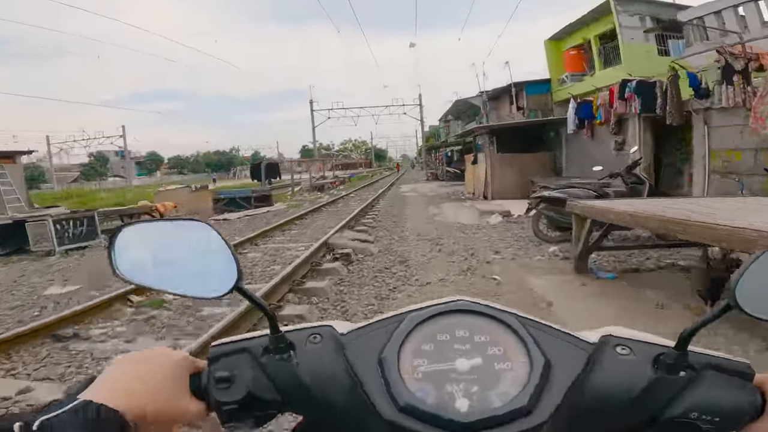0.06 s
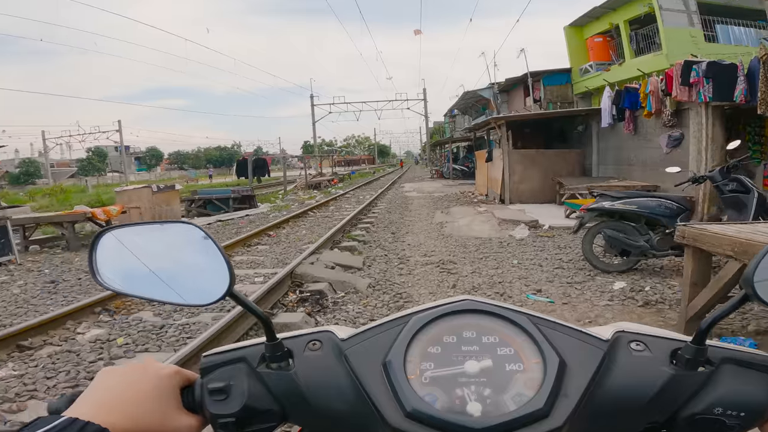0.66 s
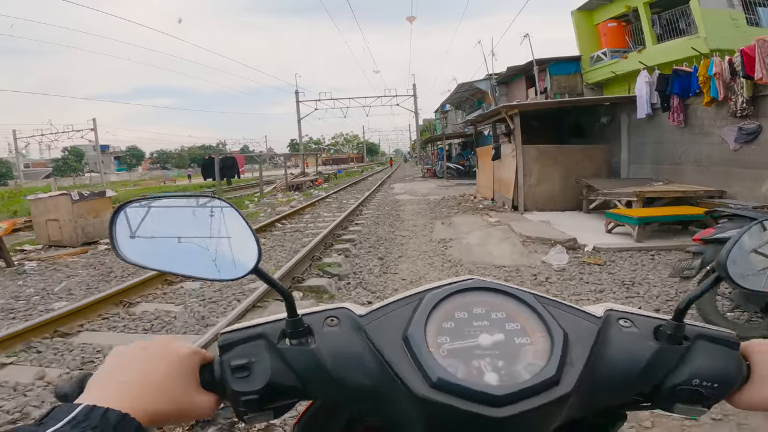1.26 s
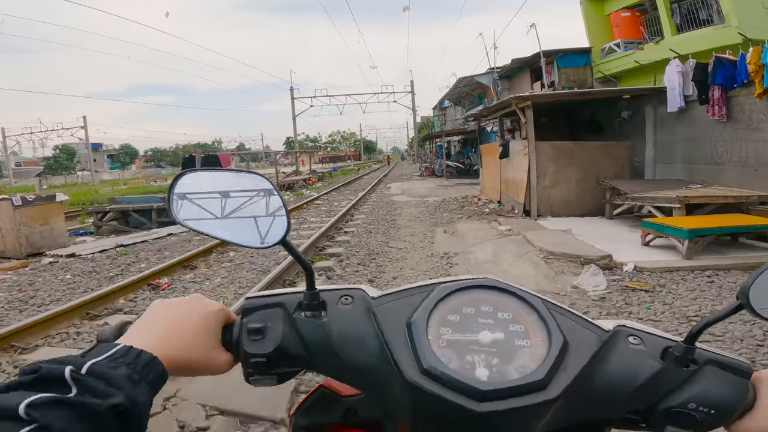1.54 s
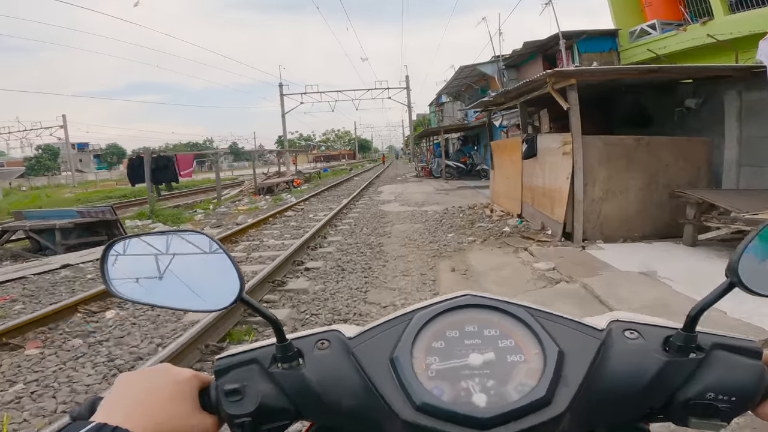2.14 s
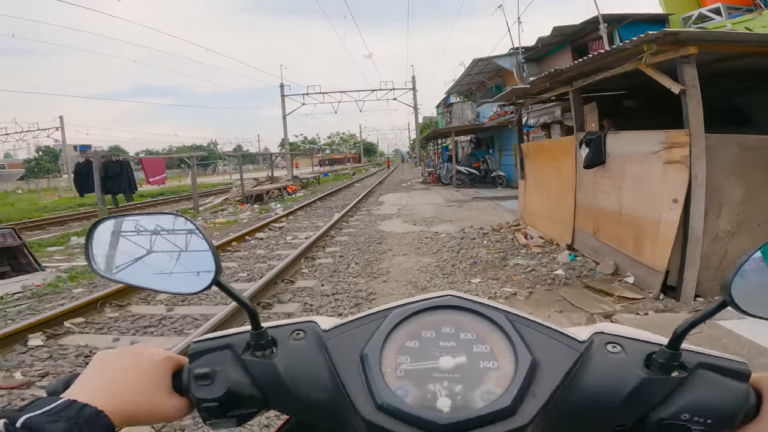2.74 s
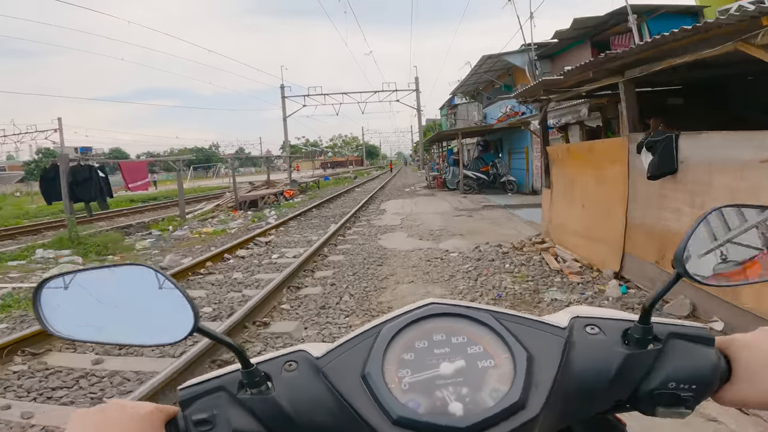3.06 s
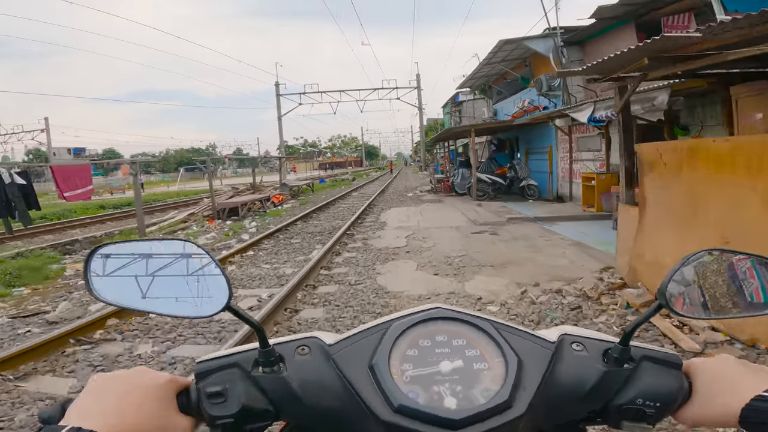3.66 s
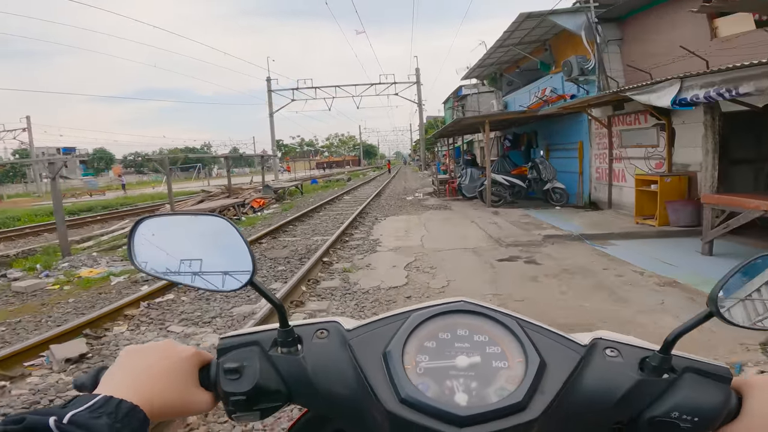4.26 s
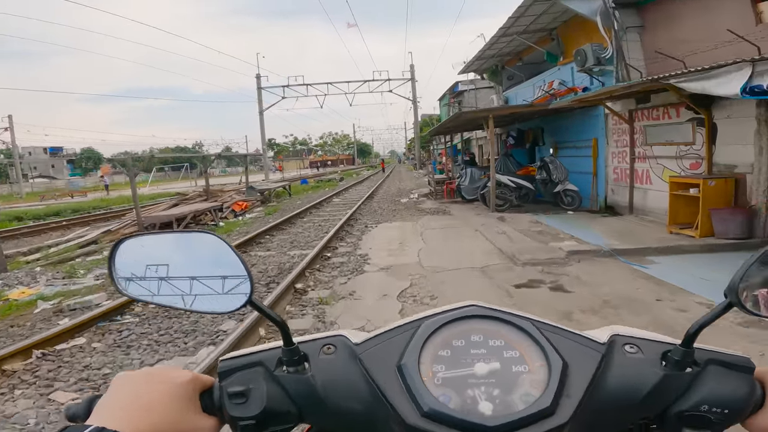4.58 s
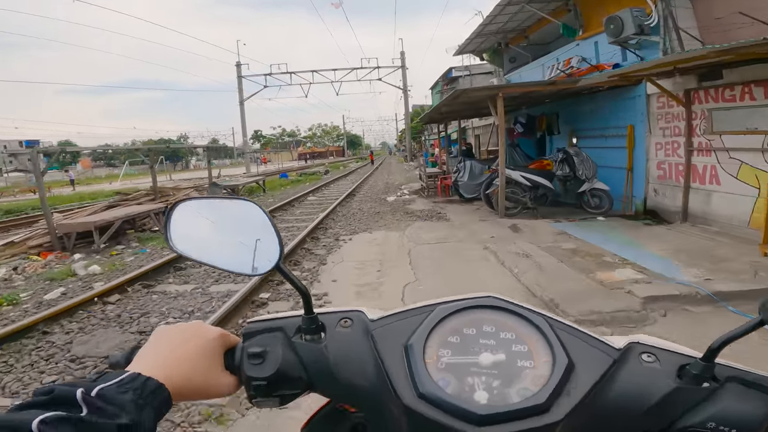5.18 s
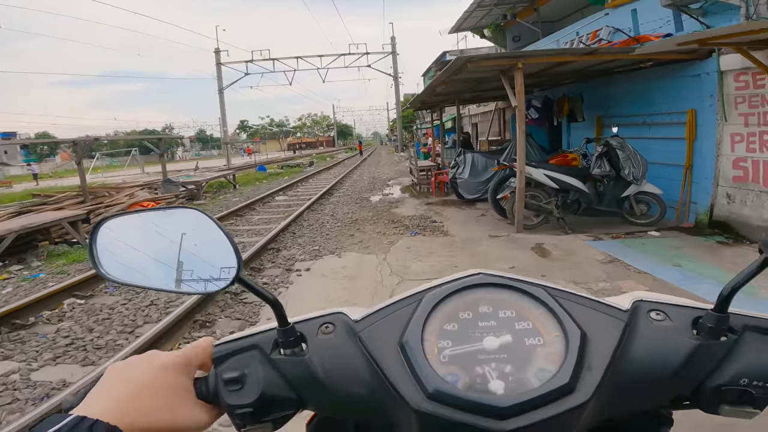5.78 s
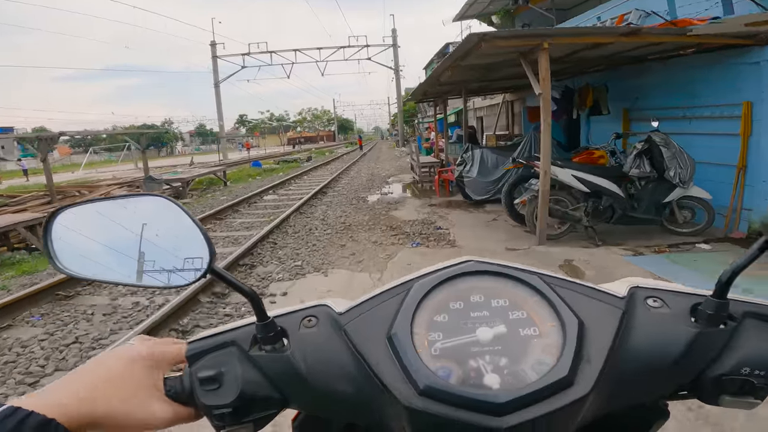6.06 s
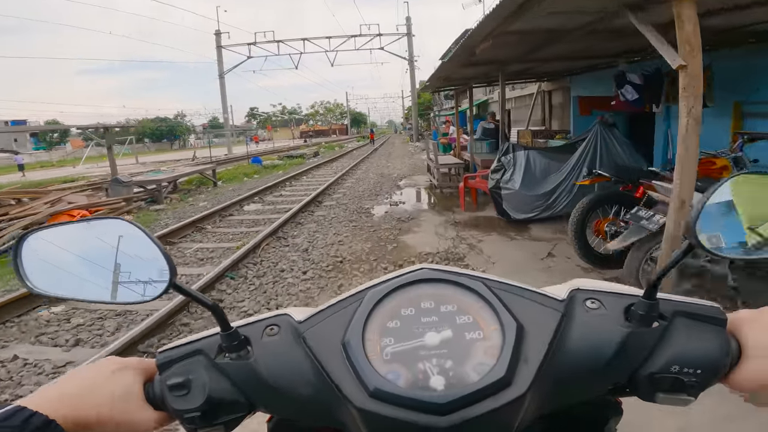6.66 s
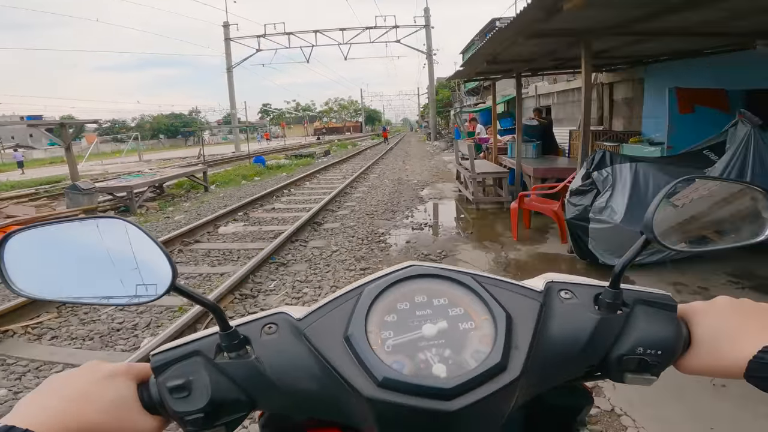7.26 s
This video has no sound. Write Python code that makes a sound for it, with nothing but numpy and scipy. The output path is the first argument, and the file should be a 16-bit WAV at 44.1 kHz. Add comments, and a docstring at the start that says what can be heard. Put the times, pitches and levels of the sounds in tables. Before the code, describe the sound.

A small single-cylinder scooter rolls slowly over an outdoor gravel path for about seven seconds, heard close from the rider's chest. The engine keeps up a fast, low, thumping putter over a drive whirr and body rumble. It revs gently from 0.3 to 1.4 seconds, from 2.7 to 3.8 and, more mildly, from 5.3 to 6.7, sinking toward idle after each pull. Gravel crunches and single stones pop under the tyres throughout, most densely from 1.5 to 2.7 seconds and around 4.2. One faint, thin squeak falls at 0.9 seconds. Hard jolts knock the hollow body at 1.7 and 2.2 seconds, with plastic panels rattling and loose metal clinking until about 2.7. Lighter clatter returns from 3.9 to 4.7 seconds. A faint, rough belt hum appears while coasting, around 2.3 and 4.6. A clack and a small clink come just before 6 seconds, then the ground sounds smoother.

```python
"""A small single-cylinder scooter creeps along a gravel path, heard from the rider's chest.
Three gentle pulls on the throttle; every firing thumps the silencer and air box, over the whirr
of the drive. Stones crunch and pop under the tyres, sharp engine knocks and bumps rattle the panels,
hard jolts knock the hollow body, and a loose metal part clinks. There is one thin squeak, and the
slack belt hums when coasting."""
import sys
import numpy as np
from scipy import signal
from scipy.fft import rfft, irfft, next_fast_len
from scipy.io import wavfile

SR = 44100
rng = np.random.default_rng(int(sys.argv[2]) if len(sys.argv) > 2 else 0)


def materialize(psi):
    """Save the field psi as 16-bit PCM at rate SR to the path in sys.argv[1].

    A 1-D psi becomes a single channel; in a 2-D psi each row is a channel.
    """
    bounded = np.clip(np.atleast_2d(psi).T, -1, 1)
    quanta = np.round(bounded * 32767).astype(np.int16)
    wavfile.write(sys.argv[1], SR, quanta)


N = 327177
TIME = np.arange(N) / SR
SIDES = np.array([[1], [-1]])  # left, right
IDLE_PER_S = 16.378  # firings per second at the start
LOOSE_DB = -45  # crunch level at which the pebble and grit rates are set

# Stereo image between two close listening points: pitch_hz, likeness (0-1), left_lead_rad
STEREO_IMAGE = [(100, 0.99, -0.065), (300, 1, -0.14), (594, 0.99, -0.43), (820, 0.82, -0.56),
                (1100, 0.9, -0.44), (1700, 0.87, -0.62), (2800, 0.6, -0.52), (4480, 0.7, -0.79),
                (7000, 0.7, -0.49)]


def from_db(db):
    """Decibels to gain."""
    return 10 ** (np.asarray(db) / 20)


def rms_one(x):
    """Scale to unit power."""
    return x / np.sqrt(np.mean(x ** 2) + 1e-20)


def at_hz(points, hz, column=1):
    """Read a spectrum on a log-frequency axis."""
    return np.interp(np.log(hz), np.log(np.array(points)[:, 0]), np.array(points)[:, column])


def cut(x, hz, kind, order=2):
    """Butterworth filter."""
    sections = signal.butter(order, np.clip(hz, 10, .45 * SR), kind, fs=SR, output="sos")
    return signal.sosfilt(sections, x + 1e-18)


def drift(per_s):
    """A random wander that glides between values of spread 1."""
    return np.interp(TIME * per_s, np.arange(2000), rng.standard_normal(2000))


def swell(centre_s, half_s):
    """A smooth hump of height 1."""
    return np.exp(-np.minimum(((TIME - centre_s) / half_s) ** 2, 40))


def burst(start_s, decay_s):
    """An envelope that jumps up and dies away."""
    age = TIME - start_s
    return (age >= 0) * np.exp(-np.clip(age / decay_s, 0, 40))


def ring(x, hz, width_hz):
    """A unit click starts a decaying cosine of height 1."""
    r, c = np.exp(-np.pi * width_hz / SR), np.cos(2 * np.pi * hz / SR)
    return signal.lfilter([1, -r * c], [1, -2 * r * c, r * r], x + 1e-18)


def chamber(x, hz, width_hz):
    """A resonance with a gain of about 1 at its pitch."""
    return 2 * np.pi * width_hz / SR * ring(x, hz, width_hz)


def mode(x, hz, t60_s):
    """A unit click starts a decaying tone of height 1, with no bass."""
    r, w = from_db(-60 / (t60_s * SR)), 2 * np.pi * hz / SR
    return signal.lfilter([.5, 0, -.5], [1, -2 * r * np.cos(w), r * r], x + 1e-18)


def coloured(spectrum, sources, flicker_db):
    """Shape two mid/side pairs into flickering third-octave stereo bands, at unit power overall."""
    out, edges = 0, 22 * 2 ** np.arange(0, 9.6, 1 / 3)
    for k, (low, high) in enumerate(zip(edges, edges[1:])):
        hz = np.sqrt(low * high)
        if spectrum[0][0] <= hz <= spectrum[-1][0]:
            mid, side = cut(sources[k % 2], [low, high], "band")
            alike = at_hz(STEREO_IMAGE, hz)
            gain = from_db(at_hz(spectrum, hz) + flicker_db * drift(25))
            out = out + gain * (np.sqrt(1 + alike) * mid + np.sqrt(1 - alike) * side * SIDES)
    return rms_one(out)


def strokes(cycles, spread_db):
    """One click for each whole cycle, no two equally strong."""
    at, clicks = np.flatnonzero(np.diff(np.floor(cycles)) > 0), np.zeros(N)
    clicks[at] = from_db(spread_db * rng.standard_normal(400)[:len(at)])
    return clicks


def throttle(attack_s=0.17, release_s=0.29, coast_power=1.817):
    """Firings per second and load: each pull draws the engine up, then it coasts back to idle."""
    # Throttle pulls: open_s, shut_s, aim_per_s, rise_s, coast_s, idle_after_per_s, load_fade_s
    pulls = [(.333, 1.387, 27.453, .361, .903, 17.003, 1.6), (2.706, 3.8, 25.104, .217, 1.148, 15.595, .6),
             (5.286, 6.678, 22.835, .401, .702, 16.664, 3)]
    speed, load = np.full(N, IDLE_PER_S), 0
    for open_s, shut_s, aim, rise_s, coast_s, idle, fade_s in pulls:
        held_s = np.clip(TIME - open_s, 0, shut_s - open_s)
        speed = aim + (speed - aim) * np.exp(-held_s / rise_s)
        speed = idle + (speed - idle) * (1 - np.clip((TIME - shut_s) / coast_s, 0, 1)) ** coast_power
        grip = np.clip(held_s / attack_s, 0, 1) * (1 - np.clip((TIME - shut_s) / release_s, 0, 1) ** 2)
        load = load + grip * np.exp(-(held_s / fade_s) ** 2)  # eases as the scooter gathers way
    return speed, load


def ground(shake_follows=0.23):
    """Tyre crunch and extra body shake, in dB, from the path and its ruts."""
    # Looseness of the path: time_s, crunch_db
    path = [(0, -44), (.9, -49), (1.6, -43), (2.9, -43), (3.9, -45.5), (4.5, -46), (5.8, -44.5),
            (6.3, -51.5), (7.42, -46)]
    # Ruts and heaps of stones: centre_s, half_length_s, extra_crunch_db, extra_shake_db
    ruts = [(1.687, 0.096, 2.5, 6.5), (1.993, 0.15, 5, 4), (2.189, 0.089, 4, 5), (2.528, 0.079, 5.5, 3),
            (3.035, 0.022, -2, 5), (3.942, 0.076, 2, 4), (4.226, 0.07, 6.5, 3.5), (4.607, 0.11, 4, 4)]
    path_db = np.interp(TIME, *np.transpose(path))
    crunch_db = path_db + sum(db * swell(s, half_s) for s, half_s, db, _ in ruts)
    rut_shake_db = sum(db * swell(s, half_s) for s, half_s, _, db in ruts)
    return crunch_db, shake_follows * (path_db - path_db.mean()) + rut_shake_db


def engine(cycles, revs, load, hot_pitch_ratio=1.085, brisk_per_s=12):
    """The valve's puff, the piston's weaker push and the intake's gulp all ring the silencer."""
    # Silencer resonances off load: pitch_hz, width_hz, level_db, polarity
    silencer = [(46, 64, -7.5, -1), (48.2, 9.2, -17, 1), (80.6, 9.4, -30.5, -1), (120, 9.2, -38.5, -1),
                (180.6, 23.4, -19.5, 1)]
    # Resonances that bark under effort: pitch_hz, width_hz, level_db
    barks = [(250.5, 62, -19.5), (319, 43.4, -16.5), (390, 76, -26), (790, 80, -26), (892, 89, -27),
             (1180, 120, -34)]
    # Firings weaken on the overrun: centre_s, half_length_s, dip_db
    overruns = [(1.74, 0.22, -6), (1.86, 0.064, -1.5), (4.063, 0.032, -4), (4.143, 0.027, -9.5),
                (6.862, 0.066, -4.5), (6.95, 0.021, -6), (7.06, 0.045, -5)]
    dip_db = sum(db * swell(s, half_s) for s, half_s, db in overruns)
    strength = from_db(-2 + 0.5 * load + 0.243 * revs + dip_db)
    puff = strength * strokes(cycles, spread_db=0.4)
    push = strength * strokes(cycles - 0.1943, spread_db=0.7)
    gulp = strength * strokes(cycles - 0.4314, spread_db=2.0)
    idle_gas = cut((1 - load) * (puff + 0.16 * push + 0.15 * gulp), 30, "high")
    hot_gas = cut(load * (puff + 0.42 * push + 0.013 * gulp), 48, "high")
    pipe = 0
    for hz, width_hz, db, polarity in silencer:
        ringing = ring(idle_gas, hz, width_hz) + ring(hot_gas, hot_pitch_ratio * hz, width_hz)
        pipe = pipe + polarity * from_db(db) * ringing
    # the air box makes each thump swell and ring hollow
    thumps = pipe + from_db(15) * chamber(pipe, hz=172, width_hz=48)
    # as the revs rise the deep boom thins to a pitched putter
    brisk = np.clip(revs / brisk_per_s, 0, 1)
    thumps = thumps - 0.6 * brisk * chamber(thumps, hz=90, width_hz=56)
    # effort sharpens the puffs and wakes higher resonances, which swell through two chambers
    sharp = (0.79 * load + 0.35 * brisk) * (puff + 0.32 * push)
    bark = sum((-1) ** k * from_db(db) * chamber(ring(sharp, hz, width_hz), hz, width_hz)
               for k, (hz, width_hz, db) in enumerate(barks))
    return cut(thumps, 256, "low") + bark


def drive(cycles, revs, load, shake_db, clutch_lag_s=0.1, throb=0.054, rasp_cycles=.2):
    """Belt and valve gear whirr through the casing; a rasp of gas follows every firing."""
    # Spectrum of the whirr: pitch_hz, density_db
    spectrum = [(260, -25.5), (450, -5.5), (704, -5), (787, -1), (959, 0), (1100, -4.5), (1250, -6),
                (1360, -3), (1760, -12), (2970, -12), (4360, -24.5), (4580, -26), (5000, -38), (6730, -22),
                (8740, -40), (11400, -62), (19200, -120)]
    # Casing resonances: pitch_hz, width_hz, level_db
    casing_modes = [(806.3, 21, -6), (1128, 78, -10), (1383, 66, -11), (3490, 64, -33), (5070, 320, -18.5)]
    pulse = 1 + throb * np.cos(2 * np.pi * (cycles - .25))
    whirr = coloured(spectrum, rng.standard_normal((2, 2, N)), flicker_db=2.5) * pulse
    casing = sum(from_db(db) * rms_one(mode(rng.standard_normal(N), hz, np.log(1000) / np.pi / width))
                 for hz, width, db in casing_modes)
    gas = rng.standard_normal(N) * np.exp(-(cycles % 1) / rasp_cycles)
    rasp = rms_one(cut(gas, [480, 1500], "band"))
    belt_revs = np.interp(TIME - clutch_lag_s, TIME, revs)
    level_db = -39.5 + 0.52 * load + 0.3722 * belt_revs + 0.14 * shake_db
    return from_db(level_db) * (from_db(1.5) * whirr + casing + from_db(-4.5) * rasp)


def crank(cycles, revs):
    """The piston shakes the frame once per revolution, twice per firing, even when the engine misses."""
    frame = ring(strokes(2 * cycles - 0.4, spread_db=1.0), hz=56, width_hz=26)
    return from_db(-35 + 0.45 * revs) * rms_one(cut(frame, 80, "low", order=4))


def cam_chain(cycles, speed, load, teeth=35, cover_hz=594, cover_width_hz=38):
    """Links meet the sprocket in a thin, wavering whine that finds the cover's resonance near idle."""
    mesh_phase = 2 * np.pi * teeth * cycles + 1.35 * drift(45)
    response = 1 / np.hypot(1, 2 * (teeth * speed - cover_hz) / cover_width_hz)
    return from_db(-38.5 - 5 * load + 1.5 * drift(6.8)) * response * np.sin(mesh_phase)


def body_rumble(shake_db, level_db=-29):
    """The ground shakes the body into a low rumble."""
    # Spectrum of the rumble: pitch_hz, density_db
    spectrum = [(22, -11.5), (45, 2.5), (75, -7), (130, 0.5), (240, -4), (310, -7), (420, -4.5),
                (560, -12.5), (750, -24.5), (1200, -37)]
    noise = rng.standard_normal((2, 2, N))
    return from_db(level_db + shake_db) * coloured(spectrum, noise, flicker_db=2.5)


def gravel(crunch_db, grains_per_s=600, spread_db=4.0, smooth_db=-47):
    """Clumps of grains grind under the tyres, denser and louder where the path is loose."""
    # Spectrum of the crunch: pitch_hz, density_db
    spectrum = [(530, -37.5), (900, -0.5), (1530, -10), (1720, 1.5), (3250, -13), (3570, -8), (3710, -6),
                (4940, -11.5), (7800, -26), (8740, -51.5), (11400, -65.5), (19200, -120)]
    loose = 1 / (1 + from_db(smooth_db - crunch_db) ** 2)
    shape = (2, 2, N)
    struck = rng.random(shape) < grains_per_s * loose * from_db(4 * drift(50)) / SR
    sizes = from_db(spread_db * np.minimum(rng.exponential(1, shape), 4))
    grains = struck * sizes * rng.choice([-1, 1], shape)
    sources = [grains[0] + grains[1], grains[1] - grains[0]]  # every grain reaches every band
    return from_db(crunch_db - 0.2) * loose * coloured(spectrum, sources, flicker_db=1.0)


def grit(crunch_db, ticks_per_s=130, low_hz=2500, high_hz=12500, ring_cycles=14, octave_db=-8):
    """Single chips tick at scattered pitches and pans, crackling where the path is loose."""
    loose_db = crunch_db - LOOSE_DB
    at = np.flatnonzero(rng.random(N) < ticks_per_s * from_db(1.5 * loose_db) / SR)
    size = from_db(-37 + 0.38 * loose_db[at] + 3 * np.minimum(rng.exponential(1, len(at)), 4))
    pitches = np.geomspace(low_hz, high_hz, 16)
    pitch_index = rng.integers(0, len(pitches), len(at))
    pan = from_db(3 * rng.standard_normal(len(at)) * SIDES)
    out = 0
    for k, hz in enumerate(pitches):
        clicks = np.zeros((2, N))
        clicks[:, at] = (pitch_index == k) * size * pan
        out = out + from_db(octave_db * np.log2(hz / low_hz)) * mode(clicks, hz, ring_cycles / hz)
    return out


def panel_rattle(contacts_per_s=1300):
    """Sharp engine knocks and bumps clack the plastic panels, which chatter against their fixings."""
    # Sharp engine knocks and bumps: start_s, force_db, chatter_s
    hits = [(.038, -21, 0.0035), (0.541, -22, 0.002), (0.7215, -22.5, 0.015), (1.693, -18.5, 0.0079),
            (1.707, -23, 0.01), (2.095, -17, 0.01), (2.1769, -14, 0.013), (2.238, -25, 0.016),
            (2.515, -24.5, 0.012), (2.578, -20, 0.004), (2.7412, -20.5, 0.014), (3.9078, -23.5, 0.0037),
            (4.183, -25, 0.019), (4.292, -22.5, 0.022), (5.658, -18, .003)]
    # Panel resonances: pitch_hz, level_db, t60_s
    panel_modes = [(326, -4, 0.046), (465, 12.5, 0.033), (780, -12, 0.052), (1420, -10, 0.043),
                   (1540, 1, 0.028), (1950, -6, 0.032), (2230, -4.5, 0.068), (2880, -8, 0.06),
                   (3550, -8.5, 0.0086), (4850, -6.5, 0.012), (7400, 4.5, 0.0055)]
    force = sum(from_db(db) * burst(s, chatter_s) for s, db, chatter_s in hits)
    contacts = force * (rng.random(N) < contacts_per_s / SR)
    blows = 1.1 * np.maximum(np.diff(force, prepend=0), 0)
    ringing = sum(from_db(db) * mode((-1) ** k * blows + contacts * rng.standard_normal(N), hz, t60_s)
                  for k, (hz, db, t60_s) in enumerate(panel_modes))
    clack = force * rms_one(cut(rng.standard_normal(N), [260, 2200], "band"))
    return cut(from_db(-18) * ringing + from_db(-4) * clack, 5000, "low")


def pebbles(crunch_db, per_s=9, centre_hz=3200, spread_octaves=0.35, treble_db=-13):
    """Rows for stone_pops: small stones at random, more and louder on loose ground."""
    loose_db = crunch_db - LOOSE_DB
    at = np.flatnonzero(rng.random(N) < per_s * from_db(loose_db) ** 2 / SR)[:200]
    size, pitch = rng.standard_normal((200, 2))[:len(at)].T
    level_db = -34.5 + 0.24 * loose_db[at] + 2.2 * size
    pitch_hz = centre_hz * 2 ** (spread_octaves * pitch)
    return list(zip(at / SR, level_db, pitch_hz, np.full(len(at), treble_db)))


def stone_pops(crunch_db, crush_s=0.0031, snap_s=.0035, skitter_s=0.013, width=0.2):
    """A stone is crushed under the tread, snaps in a cluster of tiny cracks and skitters briefly."""
    # The loudest stones, levels relative: snap_at_s, level_db, pitch_hz, splinter_db
    loud_stones = [(.1645, -27.5, 3300, -16), (.5774, -26.5, 3500, -25), (1.384, -22, 2800, -26),
                   (1.5357, -21.5, 2840, -26), (1.713, -24, 3200, -15), (1.9121, -21, 2600, -25),
                   (1.9639, -27, 5500, -6), (1.9999, -22, 4440, -5), (2.045, -29, 4500, -4),
                   (2.081, -28, 3200, -7.5), (2.166, -26, 5000, -3), (2.4595, -30, 5980, -6),
                   (2.5147, -23, 3780, -11), (2.605, -30.5, 5540, 0), (2.796, -26.5, 4373, -22),
                   (3.479, -27.5, 3800, -12), (3.9096, -21, 2480, -23), (3.9995, -30, 5000, -11),
                   (4.0577, -24, 3400, -20), (4.129, -29, 3460, -9), (4.1779, -26, 3580, -5),
                   (4.192, -21, 4600, -10), (4.2712, -22, 3790, -11), (4.477, -38, 3400, -10),
                   (4.7835, -25, 3490, -23), (4.9656, -29.5, 3510, -21), (5.0774, -29.5, 3500, -16),
                   (5.1572, -26.5, 3173, -17), (5.252, -31, 5070, -6), (5.8253, -30, 3800, -9),
                   (5.879, -28, 4400, -18), (6.4612, -25, 3750, -8)]
    lead, length = SR // 100, SR // 10
    age = (np.arange(length) - lead) / SR
    before, after = np.minimum(age, 0), np.maximum(age, 0)
    decay = np.exp(-after / snap_s) + from_db(-12) * np.exp(-after / skitter_s)
    envelope = np.exp(before / crush_s) * decay
    out = np.zeros((2, N + length))
    for s, db, hz, splinter_db in loud_stones + pebbles(crunch_db):
        cracks_db = 5 * np.interp(np.arange(length), np.linspace(0, length, 100), rng.standard_normal(100))
        mid, side = rng.standard_normal((2, length)) * envelope * from_db(cracks_db)
        snap = mid + width * side * SIDES
        core = cut(cut(snap, [hz * .5, hz * 1.42], "band"), 8000, "low", order=6)
        pop = core + from_db(splinter_db - 12) * cut(snap, 3100, "high")
        at = max(round(s * SR) - lead, 0)
        out[:, at:at + length] += from_db(db + 2.5) * pop / np.abs(pop).max()
    return out[:, :N]


def metal_clinks(bounce_s=.0056, t60_s=.1, upper_ratio=1.44, upper_db=-12):
    """Loose metal touches twice and rings for a moment in two modes."""
    # Clinks: start_s, level_db, pitch_hz
    hits = [(.578, -36, 3490), (1.100, -36, 4280), (1.921, -32, 3490), (2.178, -22, 3490),
            (2.520, -27.5, 3490), (2.670, -32, 3490), (5.888, -24, 3485)]
    out, sample = np.zeros(N), np.arange(N)
    for s, db, hz in hits:
        touches = (sample == round(s * SR)) + .5 * (sample == round((s + bounce_s) * SR))
        upper = from_db(upper_db) * mode(touches, hz * upper_ratio, t60_s / 2)
        out += from_db(db) * (mode(touches, hz, t60_s) + upper)
    return cut(out, 6000, "low")


def squeak(start_s=0.918, end_s=0.98, from_hz=7200, to_hz=6250, level_db=-42, blur_hz=140):
    """One thin, falling squeak with a rough edge."""
    along = np.clip((TIME - start_s) / (end_s - start_s), 0, 1)
    tone = np.sin(2 * np.pi * np.cumsum(from_hz + (to_hz - from_hz) * along) / SR)
    flutter = rms_one(cut(rng.standard_normal(N), blur_hz, "low"))
    return from_db(level_db) * np.sqrt(np.abs(np.sin(np.pi * along))) * tone * flutter


def trim_clatter(contacts_per_s=240, low_hz=1150, high_hz=7000, ring_cycles=17, octave_db=-4.5):
    """Loose bits of trim chatter in dense bursts, each with a short ring of its own."""
    # Stretches of rough ground: centre_s, half_length_s, level_db
    rough_patches = [(1.65, 0.071, -36), (1.963, 0.095, -41), (2.103, 0.077, -41), (2.216, 0.039, -39),
                     (3.934, .13, -45), (4.24, 0.082, -40), (4.62, 0.11, -44)]
    struck = rng.random(N) < contacts_per_s * from_db(4 * drift(60)) / SR
    touches = struck * from_db(1.5 * np.minimum(rng.exponential(1, N), 3)) * rng.choice([-1, 1], N)
    pitches = np.geomspace(low_hz, high_hz, 18)
    pitch_index, out = rng.integers(0, len(pitches), N), 0
    for k, hz in enumerate(pitches):
        pan = from_db(1.8 * rng.standard_normal() * SIDES)
        ringing = mode(touches * (pitch_index == k), hz, ring_cycles / hz)
        out = out + pan * from_db(octave_db * np.log2(hz / low_hz)) * ringing
    return rms_one(out) * sum(from_db(db) * swell(s, half_s) for s, half_s, db in rough_patches)


def body_knocks(rebound_s=.0115, rebound_db=-7, spread_db=1.5):
    """A hard jolt strikes the hollow body and rebounds once, a little different in tone each time."""
    # Hard jolts: start_s, level_db
    jolts = [(1.6931, -15.5), (2.166, -22.5), (2.1765, -16), (2.578, -30)]
    # Resonances of the hollow under the seat: pitch_hz, level_db, t60_s
    hollow_modes = [(240, -1.5, 0.072), (310, -5, 0.082), (425, -3, .06), (482, -4.5, 0.051),
                    (567, -15, 0.034)]
    out = 0
    for k, (hz, mode_db, t60_s) in enumerate(hollow_modes):
        blows = np.zeros(N)
        for s, db in jolts:
            at = [round(s * SR), round((s + rebound_s) * SR)]
            blows[at] += from_db(db + np.array([0, rebound_db]) + spread_db * rng.standard_normal(2))
        out = out + (-1) ** k * from_db(mode_db) * mode(blows, hz, t60_s)
    return cut(out, 1500, "low")


def belt_hum(cycles, pitch_hz=1340, t60_s=0.047, throb=.5):
    """While coasting, the slack belt rubs its cover into a rough hum that throbs with the engine."""
    # The wheel drives the slackening belt: centre_s, half_length_s, level_db
    coasts = [(2.3, 0.38, -50), (4.65, .45, -44.5)]
    rubbing = rng.standard_normal(N) * (1 + throb * np.cos(2 * np.pi * cycles))
    envelope = sum(from_db(db) * swell(s, half_s) for s, half_s, db in coasts)
    return rms_one(mode(rubbing, pitch_hz, t60_s)) * envelope


def scene():
    """Engine, drive, tyres and bodywork, all riding along with the listener."""
    speed, load = throttle()
    crunch_db, shake_db = ground()
    revs = speed - IDLE_PER_S  # firings per second above idle
    cycles = .31 + np.cumsum(speed) / SR  # one firing per cycle
    rumble = body_rumble(shake_db)
    machine = engine(cycles, revs, load) + drive(cycles, revs, load, shake_db) + crank(cycles, revs)
    machine += cam_chain(cycles, speed, load) + belt_hum(cycles)
    tyres = gravel(crunch_db) + grit(crunch_db)
    bodywork = panel_rattle() + body_knocks() + trim_clatter() + metal_clinks()
    return machine + rumble + tyres + bodywork + squeak() + stone_pops(crunch_db)


def record(dry, balance_db=0.35, ceiling=0.6, cutoff_hz=13000):
    """Left and right hear the scene slightly out of phase; peaks are rounded and the top is cut."""
    size = next_fast_len(N + SR // 10)
    hz = np.maximum(np.arange(size // 2 + 1) * SR / size, 1)
    lead_rad = at_hz(STEREO_IMAGE, hz, column=2)
    shifted = irfft(rfft(dry, size) * np.exp(.5j * lead_rad * SIDES), size)[:, :N]
    rounded = ceiling * np.tanh(shifted * from_db(balance_db * SIDES) / ceiling)
    return cut(rounded, cutoff_hz, "low", order=12)


dry = scene()
out = record(dry)
materialize(out)
```